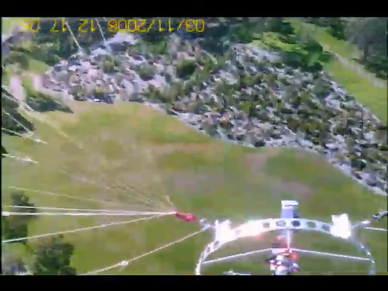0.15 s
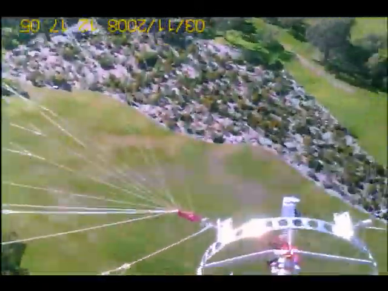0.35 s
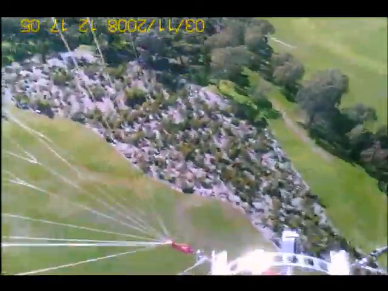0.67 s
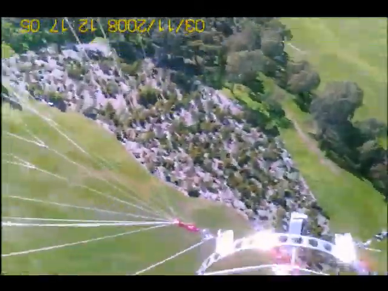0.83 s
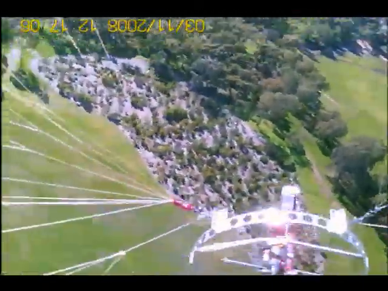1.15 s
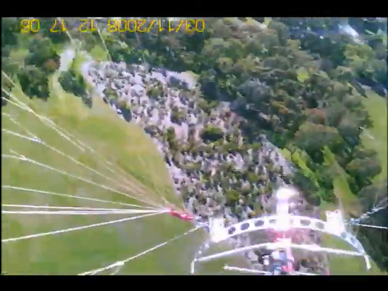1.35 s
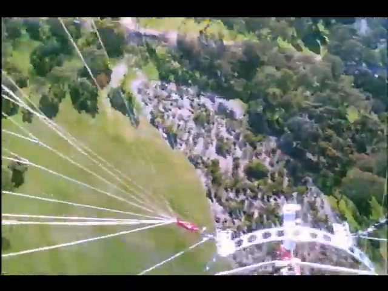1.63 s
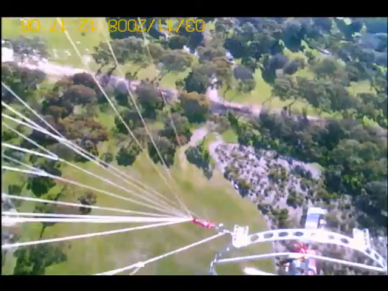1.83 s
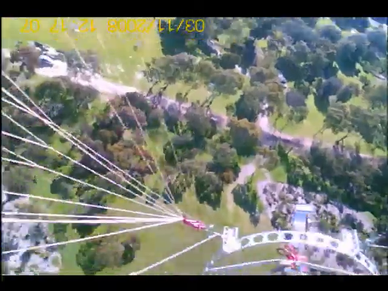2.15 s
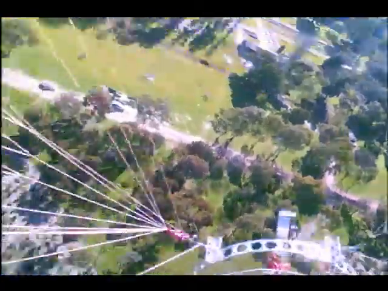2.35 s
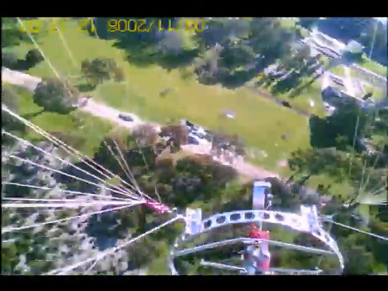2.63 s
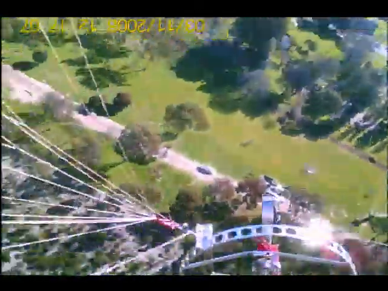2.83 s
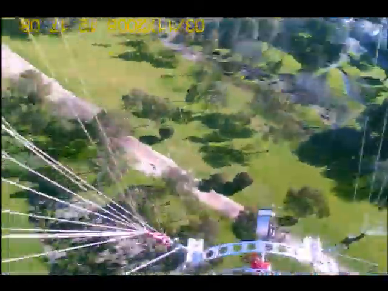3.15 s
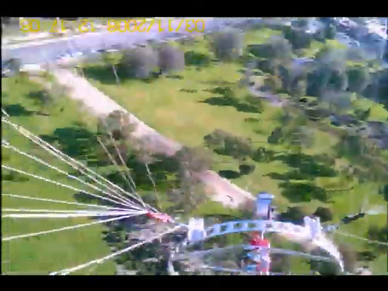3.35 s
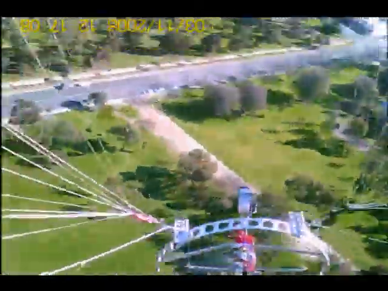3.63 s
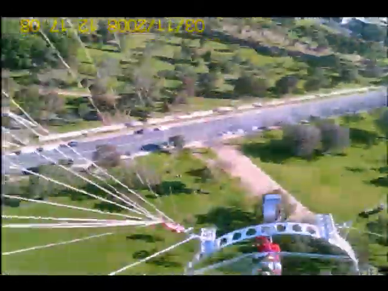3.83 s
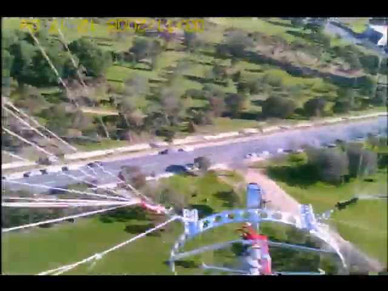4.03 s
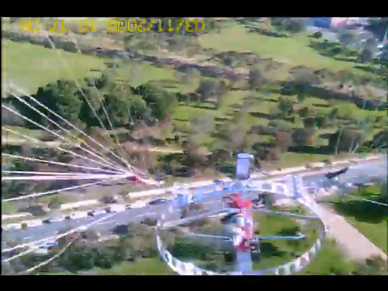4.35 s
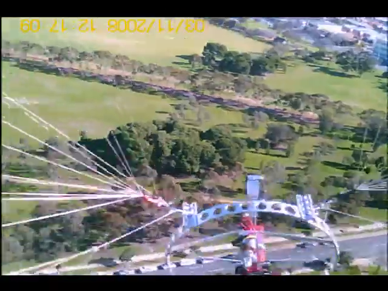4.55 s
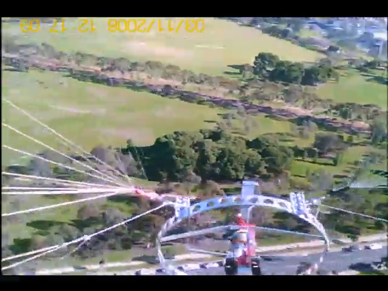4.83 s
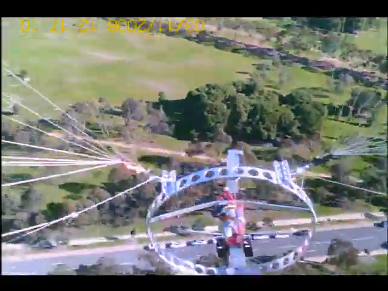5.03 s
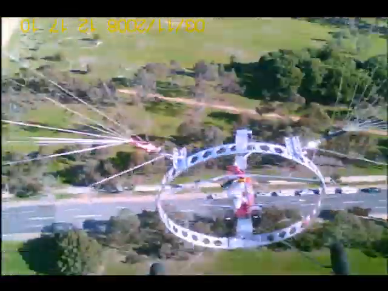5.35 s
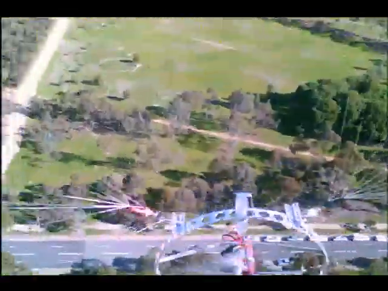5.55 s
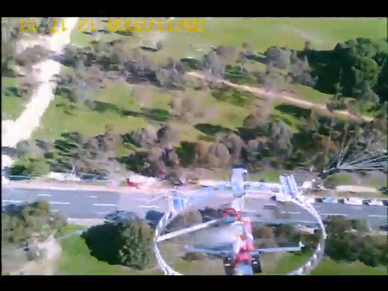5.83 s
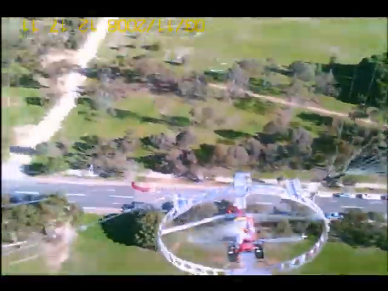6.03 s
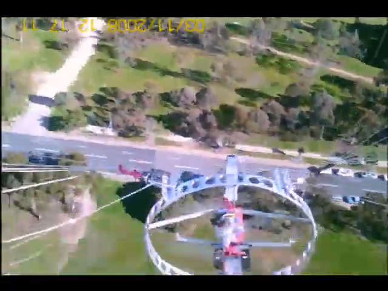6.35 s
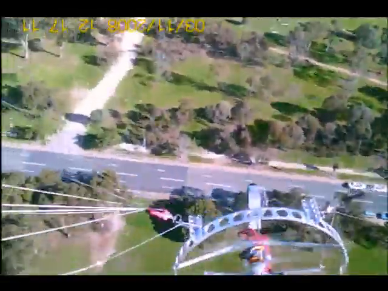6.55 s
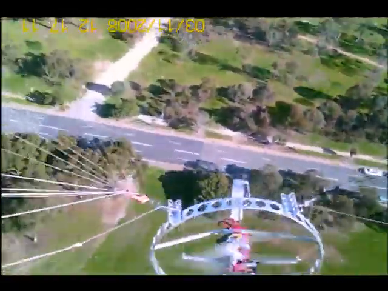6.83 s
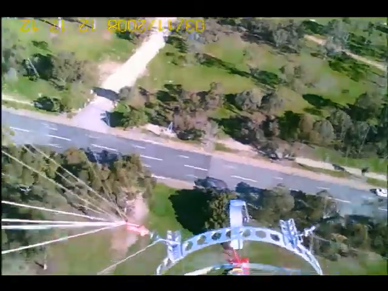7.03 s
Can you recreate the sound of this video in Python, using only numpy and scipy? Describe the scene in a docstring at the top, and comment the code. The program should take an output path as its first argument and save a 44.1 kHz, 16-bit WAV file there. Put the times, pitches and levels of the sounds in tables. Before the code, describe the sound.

Wind buffets the microphone with rumble and crackle over the hard, even drone of a small propeller engine in flight.

```python
"""A hard, steady engine buzz under gusting wind: a powered paraglider cruising, heard from up in its wing.
Engine and propeller fire two sharp pulses a turn, with puffs of hiss between them.
The tone shifts as the trike swings below the wing, and the airstream buffets the microphone
with rumble, flutter, crackle and pops."""
import sys
import numpy as np
from scipy import signal
from scipy.fft import rfft, irfft
from scipy.io import wavfile
from scipy.ndimage import uniform_filter1d

SR = 44100
rng = np.random.default_rng(int(sys.argv[2]) if len(sys.argv) > 2 else 0)


def int16_out(signal):
    """Quantize to a 16-bit WAV file."""
    q = np.round(np.clip(np.atleast_2d(signal).T, -1, 1) * 32767)
    wavfile.write(sys.argv[1], SR, q.astype(np.int16))


N = 317079
EDGE_HZ = 10750  # top of the camera's band
# strength of the airstream on the microphone: t/s, relative level/dB
AIRSTREAM = [(0.0, 0), (0.78, 2.0), (0.99, 1.2), (1.29, 2), (2.26, 2.6), (2.38, 0.3), (2.68, 0),
             (3.34, 3.5), (3.61, -0.5), (3.88, 1.5), (4.21, 2.0), (4.63, -3.5), (4.96, -2.8), (5.32, -8),
             (5.75, 0), (6.17, -3.0), (6.32, 1.5), (7.19, 0.8)]


def motor(buzz_db=-27.0, shaft_db=-33.5):
    """Engine and propeller: a buzz of sharp pulses, their hiss and the shaft's hum, locked to one speed."""
    # shaft speed: t/s, rotation rate/Hz
    shaft_speed = [(0.0, 140.51), (0.54, 140.57), (0.96, 140.71), (1.71, 140.64), (2.68, 140.82),
                   (4.18, 140.89), (4.3, 140.82), (5.81, 140.71), (6.32, 140.9), (7.19, 140.9)]
    # tone colour of one pulse: multiple of the pulse rate, relative level/dB
    harmonics = [(1, 2), (2, -2.5), (3, -16), (4, -0.5), (5, -1.5), (6, 0), (7, 3), (8, -5.5), (9, -9.5),
                 (10, -9.5), (11, -11), (12, -5), (13, -1.5), (14, -3.5), (15, -3), (16, -13.5), (17, -9),
                 (18, -7.5), (19, -7.5), (20, -11.5), (21, -12.5), (22, -19.5), (23, -20), (24, -18),
                 (25, -16), (26, -16.5), (27, -15.5), (28, -11.5), (29, -9), (30, -8), (31, -14.5),
                 (32, -13), (33, -18), (34, -25), (35, -33), (36, -41), (37, -66.5)]
    speed, = follow(shaft_speed)
    turns = np.cumsum(speed * (1 + .0002 * wander(15))) / SR
    colour = [(k * 2 * speed.mean(), db) for k, db in harmonics]
    clicks = pulses(turns)
    buzz = gain_of(buzz_db + 0.46 * wander(23)) * coloured(clicks - clicks.mean(), colour, smear_s=0.000392)
    hum = gain_of(shaft_db + 1.26 * wander(3.6)) * unit_rms(np.cos(2 * np.pi * turns))
    return swing(buzz, depth=1.4, fade_db=3.0) + swing(puffs(turns), depth=0.52, fade_db=1.2) + hum


def pulses(turns, lag_s=2e-5, weaker=.12, jitter_s=3e-6, scatter_db=.35):
    """Two dips of pressure a turn; every second one is a touch weaker and later, and no two are alike."""
    k = np.arange(1, int(2 * turns[-1]))
    shift, strength = rng.standard_normal((len(k), 2)).T
    at = np.interp(k / 2, turns, np.arange(N)) + SR * (lag_s * (k % 2) + jitter_s * shift)
    depth = (1 - weaker * (k % 2)) * gain_of(scatter_db * strength)
    near = at.astype(int)[:, None] + np.arange(-8, 9)
    away = near - at[:, None]
    click = np.sinc(away) * np.cos(np.pi * away / 18) ** 2  # can land between samples
    return -np.bincount(np.clip(near, 0, N - 1).ravel(), (depth[:, None] * click).ravel(), N)


def puffs(turns, burst_db=-40.0, swish_db=-35.5, steady=0.27):
    """A short bright burst of hiss rides on each pulse, with a duller swish midway to the next."""
    # tone colour of the hiss: f/Hz, relative level/dB
    hiss = [(600, -9), (1500, -1), (2050, 1.5), (2400, -7), (2750, -14), (3000, -13), (3300, -4),
            (3750, .5), (4700, -7), (5700, -8.5), (6400, -14.5), (7600, -10.5), (8400, -1.5), (10400, -24)]

    def swell(centre, width):  # both in pulse periods
        away = (2 * turns - centre + .5) % 1 - .5
        return np.exp(-(away / width) ** 2)
    bright = [(hz, db + 8 * hz / EDGE_HZ) for hz, db in hiss]
    burst = coloured(swell(0.094, width=0.13) * rng.standard_normal(N), bright)
    swish = coloured((steady + swell(0.61, width=0.21)) * rng.standard_normal(N), hiss)
    return gain_of(burst_db) * burst + gain_of(swish_db) * swish


def swing(x, depth, fade_db):
    """The trike beams its bands unevenly as it swings; shifting reflections fade single overtones."""
    # rides of the treble and of the rasp near 3.7 kHz: t/s, level/dB before share and depth
    treble = [(0.0, -1.3), (0.27, -1.1), (0.72, 1.3), (1.11, 1.1), (1.32, -1.2), (2.26, 1.5), (2.8, -0.1),
              (3.28, 1.7), (3.43, -1), (3.94, -0.9), (4.03, 1.8), (4.18, -1.4), (4.36, 0.5), (6.05, -0.5),
              (6.41, 0.8), (6.56, -1), (7.1, -0.5), (7.19, -2.4)]
    rasp = [(0.0, -1), (0.45, 0.4), (4.09, 1), (4.84, -1.2), (5.93, -0.8), (7.19, 0.4)]
    # how each band follows the rides: f/Hz, share of treble, share of rasp
    bands = [(1100, 0.25, 0.43), (1900, -0.4, -0.3), (2610, 0.6, -0.7), (3300, 0.15, 1.5), (4000, 0.44, .9),
             (5200, 1, -0.4), (6800, 1.6, -0.1), (8400, 1, -0.7)]
    hz, t, spectrum = signal.stft(x, SR, nperseg=1024, noverlap=768)
    band_hz, *shares = np.transpose(bands)
    beam_db = sum(np.outer(np.interp(hz, band_hz, share), np.interp(t, *np.transpose(ride)))
                  for share, ride in zip(shares, (treble, rasp)))
    fading = uniform_filter1d(rng.standard_normal(spectrum.shape), size=7, axis=0)
    for _ in range(2):
        fading = uniform_filter1d(fading, size=70, axis=1, mode="wrap")
    fading = unit_rms(fading) * (hz / EDGE_HZ)[:, None]  # short waves fade the most
    spectrum = spectrum * gain_of(depth * beam_db + fade_db * fading)
    return signal.istft(spectrum, SR, nperseg=1024, noverlap=768)[1][:N]


def wind(rumble_db=-20, flutter_db=-29.3, crackle_db=-42.0, gust_db=1.2, gust_hz=16, eddy_hz=70):
    """Eddies pass the microphone: the stronger one is, the higher it reaches, from rumble to crackle."""
    # tone colours of the three wind layers: f/Hz, relative level/dB
    rumble = [(8, -3.5), (25, 2.5), (58, -2.5), (100, -10.5), (180, -19), (350, -30), (900, -72.5)]
    flutter = [(40, -5), (130, 2), (250, -1.5), (420, -3.5), (650, -9), (950, -21), (2500, -62.5)]
    crackle = [(100, -25), (450, 1.5), (650, 0.5), (1000, -5.5), (1500, -14), (3500, -45)]
    air_db, = follow(AIRSTREAM)
    gusts = gain_of(gust_db * wander(gust_hz))
    eddies = 2 * np.tanh(wander(eddy_hz) / 2)

    def stirred(colour, lumpiness):
        return coloured(rng.standard_normal(N) * gusts * gain_of(lumpiness * eddies), colour)
    return (gain_of(rumble_db + 0.6 * air_db) * stirred(rumble, lumpiness=2.0)
            + gain_of(flutter_db + air_db) * stirred(flutter, lumpiness=4)
            + gain_of(crackle_db + 1.9 * air_db) * stirred(crackle, lumpiness=8.5))


def buffets(hits, pop_db=2, push_db=3, rise_s=0.00302, whirl_s=0.0011, scatter_s=0.00307, push_s=0.0028):
    """A hard eddy is a low push of pressure topped by a ragged pop: four whirls, each one weaker."""
    out, t = np.zeros(N), np.arange(N) / SR
    for (start, pop, push), whirls in zip(hits, rng.standard_normal((len(hits), 4, 3))):
        near = abs(t - start) < .03
        age = t[near] - start - rise_s
        thump = np.exp(-(age / push_s / 2) ** 2) * np.cos(2 * age / push_s + whirls[0, 0])
        out[near] += gain_of(push_db + push) * thump
        for k, (delay, size, side) in enumerate(whirls):
            passage = (age - scatter_s * delay * min(k, 1)) / (whirl_s * np.exp(0.16 * size))
            whirl = (np.exp(3j * side) / (1 - 1j * passage) ** 3).real
            out[near] += gain_of(pop_db + pop) / np.sqrt(k + 1) * whirl
    return out


def small_buffets(per_s=9, base_db=-22.5, spread_db=3):
    """Lighter eddies hit at random, following the strength of the airstream."""
    when, size = rng.random((int(per_s * N / SR), 2)).T
    starts = (np.arange(len(when)) + when) / len(when) * N / SR
    db = base_db + np.interp(starts, *np.transpose(AIRSTREAM)) + spread_db * (2 * size - 1)
    return buffets(np.transpose([starts, db, db]))


def coloured(x, colour, smear_s=0):
    """Causal EQ at rms 1: each click rings on, and the band's top trails the bass by smear_s."""
    size = 4096
    hz = np.fft.fftfreq(size, 1 / SR)
    colour_hz, colour_db = np.transpose(colour)
    log_gain = np.log(gain_of(np.interp(np.log(abs(hz) + 1), np.log(colour_hz + 1), colour_db)))
    phase_lag = np.pi * smear_s * hz * abs(hz) / EDGE_HZ
    response = np.exp(np.conj(signal.hilbert(log_gain)) - 1j * phase_lag)
    ring = np.fft.ifft(response).real[:size // 2]
    return unit_rms(signal.oaconvolve(x, ring)[:N])


def wander(hz):
    """Random drift of rms 1, rolling off above hz."""
    size = 2 ** 19
    lowpass = np.exp(-(np.fft.rfftfreq(size, 1 / SR) / hz) ** 2)
    return unit_rms(irfft(rfft(rng.standard_normal(N), size) * lowpass)[:N])


def follow(rows):
    """Each column of an automation table at every sample."""
    times, *columns = np.transpose(rows)
    return [np.interp(np.arange(N) / SR, times, column) for column in columns]


def gain_of(db):
    """Decibels to a factor."""
    return 10 ** (np.asarray(db) / 20)


def unit_rms(x):
    """Scales to rms 1."""
    return x / np.sqrt(np.mean(x ** 2) + 1e-20)


def scene():
    """The motor below and the air at the microphone, in mono."""
    # the hardest eddies: t/s, relative pop level/dB, relative push level/dB
    hard_hits = [(0.079, -13, -17), (0.261, -16.5, -21), (0.534, -14, -18), (0.667, -15, -21),
                 (0.725, -14, -18), (1.687, -13.5, -21), (1.76, -14, -22), (2.198, -9.5, -26),
                 (2.627, -15, -24), (2.718, -13.5, -17.5), (2.772, -11.5, -16), (2.951, -14, -26),
                 (3.045, -16, -24), (3.11, -19.5, -20), (3.192, -18, -16), (3.354, -12.5, -26),
                 (3.888, -16, -17.5), (3.914, -13, -20), (3.943, -15, -18), (4.053, -19, -32),
                 (4.144, -13.5, -16), (4.26, -14.5, -24), (4.358, -15, -23), (4.783, -17.5, -18),
                 (4.827, -20, -30), (5.024, -15, -21), (5.264, -18, -23), (6.371, -13.5, -23),
                 (6.482, -21, -15.5), (6.841, -15.5, -23), (7.064, -15, -16.5)]
    return (motor() + wind() + buffets(hard_hits) + small_buffets())[None]


def record(dry, dc_offset=-.0608):
    """A small camera cuts the top end and adds a constant offset."""
    lowpass = signal.firwin(511, EDGE_HZ, window=("kaiser", 9), fs=SR)
    return signal.oaconvolve(dry, lowpass[None], "same") + dc_offset


dry = scene()
out = record(dry)
int16_out(out)
```